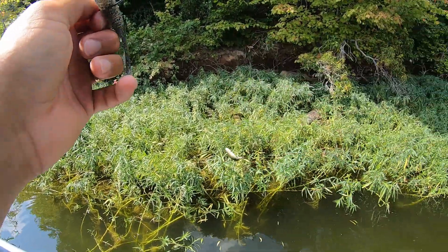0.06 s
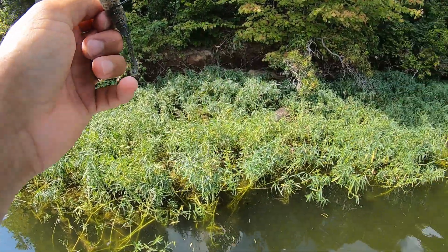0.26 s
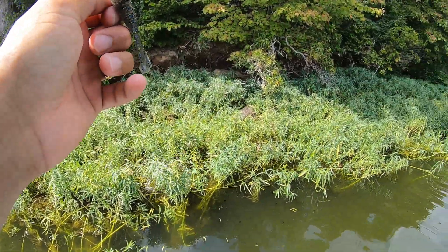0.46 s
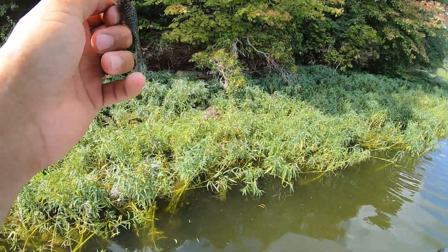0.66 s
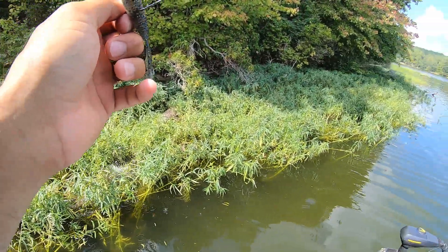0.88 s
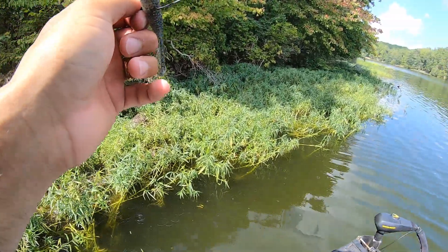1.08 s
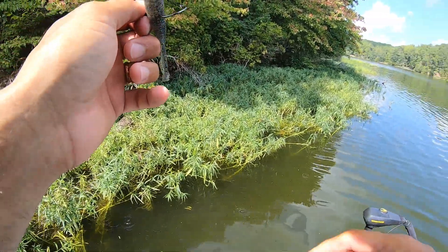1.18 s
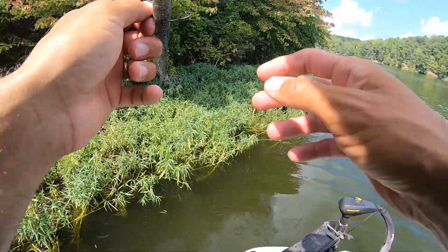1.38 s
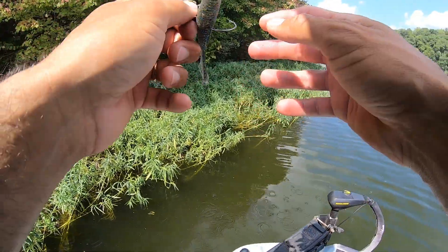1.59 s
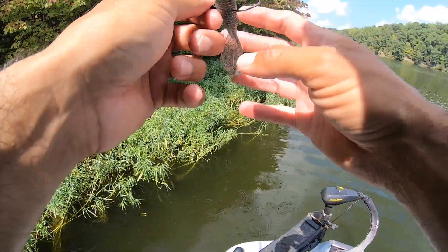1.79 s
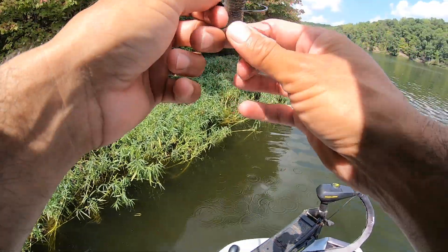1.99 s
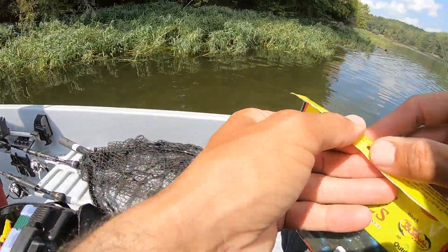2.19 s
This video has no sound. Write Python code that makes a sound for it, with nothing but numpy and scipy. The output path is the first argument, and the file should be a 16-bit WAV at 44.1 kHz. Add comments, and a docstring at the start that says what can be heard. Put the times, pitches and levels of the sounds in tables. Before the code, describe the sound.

A slapping, gurgling splash in grassy shallows is followed by falling drops, heard from a small boat on a lake. High insect hiss and soft wind continue as water laps the hull and nearby tackle clicks at the end.

```python
"""A splash in flooded grass

A weight thrown from a small boat slaps through the grass at a lake shore and gulps under as
pockets of air ring in the water. The thrown water patters back, with a faint echo off the bank.
Insects hiss in the trees, a breeze blows and low ripples lap at the hull. Near the end come
a light knock in the boat and the clicks of fishing tackle in the hands, close by."""
import sys
import numpy as np
from scipy import signal
from scipy.fft import rfft, irfft
from scipy.io import wavfile

SR = 44100
rng = np.random.default_rng(int(sys.argv[2]) if len(sys.argv) > 2 else 0)


def generate_wav(sig):
    """Save sig (samples, or channels by samples) to the path in sys.argv[1] as 16-bit PCM at SR."""
    pcm = np.round(np.clip(np.atleast_2d(sig).T, -1, 1) * 32767).astype(np.int16)
    wavfile.write(sys.argv[1], SR, pcm)


N = 99225
T = np.arange(N) / SR

# fade_s is the time to die away by 60 dB; pan_db above zero is to the left.
# Loudness of the insects' song, hiss and highest hiss: time_s, level_db
SONG_LEVEL = [(0, -45), (0.3, -45.5), (0.7, -46.5), (1.1, -46.5), (2.25, -46.5)]
HISS_LEVEL = [(0, -51.5), (0.3, -54), (1.1, -53.5), (1.7, -56), (2.25, -57.5)]
SHIMMER_LEVEL = [(0, -80), (0.85, -71), (1.2, -62), (1.5, -73), (1.9, -88)]
# Loudness of the breeze and the water sounds: time_s, level_db
BREEZE_LEVEL = [(0, -50), (0.25, -49), (0.48, -43), (0.58, -52), (0.92, -52.5), (1.35, -49), (1.6, -51),
                (2.25, -51)]
TRICKLE_LEVEL = [(0, -66.5), (0.95, -75), (1.13, -62), (1.2, -76), (1.4, -72), (1.55, -62.5), (1.9, -64),
                 (2.05, -70.5), (2.13, -58), (2.25, -60)]
SPRAY_LEVEL = [(0.185, -78), (0.205, -52.5), (0.224, -44.5), (0.234, -31.5), (0.262, -36.5), (0.285, -38),
               (0.322, -47), (0.34, -36), (0.372, -37.5), (0.40, -50), (0.46, -44.5), (0.56, -46.5),
               (0.66, -48), (0.755, -37.5), (0.78, -43.5), (0.81, -36.5), (0.865, -36.5), (0.92, -50.5),
               (0.98, -55.5), (1.2, -61.5), (1.3, -75)]
FROTH_LEVEL = [(0.37, -100), (0.39, -60), (0.41, -41), (0.43, -35.5), (0.445, -67), (0.55, -54), (0.6, -80),
               (0.87, -46.5), (0.895, -43.5), (0.915, -36.5), (0.93, -63), (0.97, -51), (1.02, -71)]
# Tone of each noise, from bass to treble: pitch_hz, gain_db
HISS_TONE = [(4000, -77), (5500, -12), (6400, 10.5), (6900, -32.5), (8000, 16.5), (8600, 7), (9600, 11),
             (10300, 8.5), (11000, 3), (13000, 5), (15800, 0)]
BREEZE_TONE = [(20, -32), (40, -13), (65, -3), (140, 3.5), (220, 0.5), (380, -3.5), (550, -13),
               (750, -16.5), (1000, -35), (1550, -21), (2200, -25), (3400, -30.5), (5500, -26),
               (16000, -53)]
SPRAY_TONE = [(120, -8), (250, 4), (400, 8.5), (520, 5.5), (760, -6), (1000, 1.5), (1300, -11.5),
              (1950, 2.5), (2950, -4.5), (4300, -4), (6000, -5.5), (7200, -12.5), (9000, -13),
              (12000, -24.5), (16000, -34)]
# Stereo width, as side against mid: pitch_hz, side_db
BREEZE_WIDTH = [(50, -16), (200, -13.5), (480, -9), (950, 12), (1900, -2.5), (8000, 0.5)]
SPRAY_WIDTH = [(200, -23), (500, -33), (1100, 0.5), (2300, -19), (4400, -17), (8000, 4.5)]
# Low, short thumps: start_s, pitch_hz, level_db, attack_s, fade_s
THUMPS = [(0.021, 74.5, -39.5, 0.015, 0.076), (0.358, 192, -26.5, 0.0082, 0.078),
          (0.388, 122, -29.5, 0.0058, 0.076), (0.436, 134, -39, 0.0039, .11),
          (0.707, 221, -35, 0.0024, 0.041), (0.748, 268, -26.5, 0.0017, 0.013),
          (1.25, 98, -32, 0.0046, 0.054), (1.281, 202, -36.5, 0.0059, 0.043),
          (1.305, 141.7, -31.5, 0.006, 0.093), (1.307, 296, -38.5, 0.0015, 0.055),
          (1.304, 470, -39.5, 0.0053, 0.071), (1.33, 91, -36.5, 0.0046, 0.075),
          (1.657, 81, -44, 0.0054, 0.093), (2.109, 117, -36.5, 0.003, 0.065)]
# Trapped air: start_s, pitch_hz, level_db, attack_s, fade_s, glide_octaves_per_s, pan_db
AIR_POCKETS = [(0.226, 1910, -26, 0.0021, 0.036, -6, -3), (0.228, 437, -27, 0.003, 0.022, -9, 2.5),
               (0.2667, 458, -22, 0.0063, 0.046, -2.5, 1.5), (0.301, 440, -20, 0.004, 0.019, 6, 1),
               (0.3012, 986, -18, 0.0031, 0.034, 9, -6), (0.2999, 1464, -21, .001, 0.0081, -8, 15.5),
               (0.3, 1840, -13, 0.00059, 0.015, -3, -3), (0.3005, 2250, -18.5, 0.0022, 0.013, 1, 2.5),
               (0.356, 336.5, -9, 0.0073, 0.02, 22.5, 1), (0.36, 1012, -31, 0.00096, 0.081, -5.5, -10),
               (0.371, 389, -28.5, 0.001, 0.2, -1, 1), (0.376, 523, -26, 0.0035, 0.032, 10, -2),
               (0.408, 1080, -33, 0.0011, 0.042, -2, -5), (0.414, 380, -28, 0.0028, 0.07, 6, -2),
               (0.423, 793, -32.5, 0.0049, 0.024, 46, -17), (0.893, 1030, -33, 0.0095, 0.037, 5, 7),
               (0.884, 540, -36, 0.012, 0.1, 6, 0), (0.942, 451, -36.5, 0.0037, 0.031, 3, -1),
               (1.161, 721, -46, 0.0022, 0.067, 0, 3), (1.793, 1086, -54, 0.0051, 0.021, 4, 14)]
# Slaps on wet grass, laps by the boat: start_s, level_db, attack_s, fade_s, low_hz, high_hz, pan_db
SLAPS = [(0.227, -22.5, 0.0033, 0.026, 1770, 6470, -2), (0.267, -30.5, 0.0012, 0.043, 1600, 3250, 0),
         (0.301, -34, 0.00059, 0.015, 5800, 6700, -1), (0.361, -31, 0.0047, 0.12, 1420, 4000, 0),
         (0.7066, -27, 0.0012, 0.0061, 300, 6000, 1), (0.726, -37, 0.0014, 0.029, 1830, 6040, -4),
         (0.7477, -20.5, 0.0016, 0.013, 1330, 7200, 4), (0.7485, -28, 0.0024, 0.012, 225, 1680, -3.5),
         (0.848, -31, 0.00023, 0.017, 1780, 2630, 7), (0.416, -37.5, 0.011, 0.037, 1570, 2320, 0),
         (0.528, -37.5, 0.00079, 0.013, 3000, 4800, 0), (0.5655, -34.5, 0.00054, 0.012, 3280, 6160, 0),
         (0.691, -43, 0.0036, 0.025, 400, 4000, 5)]
LAPS = [(1.097, -49.5, 0.0045, 0.047, 1780, 2410, 8), (1.112, -51.5, 0.0055, .04, 2100, 4460, 4),
        (1.303, -44, 0.003, 0.13, 400, 740, -5.5), (1.32, -49.5, 0.0013, 0.052, 920, 3600, -12.5),
        (1.396, -50, 0.00029, 0.016, 434, 1520, -3), (1.968, -57, 0.0023, 0.19, 1000, 4000, 4)]
# Large falling drops: start_s, pitch_hz, level_db
DRIPS = [(0.32, 1930, -33), (0.327, 440, -30.5), (0.508, 2020, -40), (0.524, 480, -41), (0.530, 1650, -40),
         (0.542, 3900, -41), (0.551, 725, -39), (0.570, 2350, -37), (0.586, 1820, -43), (0.635, 1670, -45),
         (0.650, 1900, -39), (1.163, 1120, -47)]
# Notes the boat and the tackle ring with: pitch_hz, gain_db, fade_s
BOAT_NOTES = [(180, -43, 0.15), (440, -38, 0.014), (1374, -39.5, 0.022), (1830, -43.5, 0.018),
              (2250, -54, .016)]
TACKLE_NOTES = [(890, -13.5, 0.0027), (1650, -7.5, 0.0084), (2200, -5, 0.0041), (3360, -2, 0.0036),
                (4240, -3, 0.0043), (6900, -7, 0.0012)]
# Taps on the tackle: start_s, gain_db, brightness_db_per_octave
CLICKS = [(2.1069, -27, -5), (2.1103, -32, -8), (2.1183, -41, 5), (2.1268, -31, -9), (2.163, -40, -3),
          (2.177, -34, -9), (2.195, -19.5, 5), (2.2025, -37.5, -10.5), (2.2097, -38, -6),
          (2.218, -38, -10.5)]


def from_db(db):
    """Turn decibels into a gain."""
    return 10 ** (np.asarray(db) / 20)


def normalize(x):
    """Scale to an average strength (rms) of one."""
    return x / np.sqrt(np.mean(x ** 2) + 1e-20)


def level(rows):
    """Join loudness points into a gain over time."""
    return from_db(np.interp(T, *np.transpose(rows)))


def colour(x, points):
    """Turn each pitch up or down along a curve."""
    hz, db = np.transpose(points)
    bins = np.maximum(np.fft.rfftfreq(N, 1 / SR), 1)
    return irfft(rfft(x) * from_db(np.interp(np.log(bins), np.log(hz), db)), N)


def band(x, low_hz, high_hz, order=2):
    """Keep the sound between two pitches; the low edge is never under 10 Hz."""
    low = max(low_hz, 10)
    high = max(high_hz, 1.05 * low)
    return signal.sosfilt(signal.butter(order, [low, high], "band", fs=SR, output="sos"), x)


def widen(mid, side):
    """Make left and right from what they share (mid) and how they differ (side)."""
    return np.array([mid + side, mid - side])


def add(out, start_s, sound, pan_db=0):
    """Mix in a short sound at its time and place."""
    i = int(start_s * SR)
    out[:, i:i + sound.shape[-1]] += from_db([[pan_db / 2], [-pan_db / 2]]) * sound[..., :N - i]


def waver(depth, speed):
    """A gain that wanders randomly around one."""
    return np.exp(depth * normalize(band(rng.standard_normal(N), speed / 3, speed, order=1)))


def strike(attack_s, fade_s):
    """Loudness that rises smoothly, then dies away."""
    t = T[:SR // 3]
    rise = np.sin(np.pi / 2 * np.minimum(t / attack_s, 1)) ** 2
    return rise * from_db(-60 * np.maximum(t - attack_s, 0) / fade_s)


def drops(per_s, spread_db, cycles, low_hz, high_hz, pitches):
    """Random drops, each ringing a few cycles at its own pitch; gives mid and side."""
    sizes = from_db(spread_db * np.minimum(rng.exponential(1, N), 4))
    lands = rng.random(N) < per_s / SR
    hits = sizes * lands * np.array([rng.choice([-1, 1], N), rng.standard_normal(N)])
    pitch_index = (pitches * rng.random(N) ** .7).astype(int)
    out = 0
    for k, hz in enumerate(np.geomspace(low_hz, high_hz, pitches)):
        decay = from_db(-60 * hz / (cycles * SR))
        feedback = [1, -2 * decay * np.cos(2 * np.pi * hz / SR), decay ** 2]
        out += signal.lfilter([1 - decay, 0, decay - 1], feedback, hits * (pitch_index == k) + 1e-18)
    return normalize(out)


def bubble(hz, attack_s, fade_s, octaves_per_s, wobble_hz=130):
    """A fading note that slides in pitch; it starts smooth, then wobbles."""
    shape = strike(attack_s, fade_s)
    t = T[:len(shape)]
    pitch = hz * 2 ** (octaves_per_s * np.minimum(t, fade_s / 2))
    wobble = normalize(band(rng.standard_normal((2, len(t))), wobble_hz / 10, wobble_hz))
    swell, bend = .17 * wobble * np.minimum(t / 0.025, 1)  # builds over 25 ms
    return shape * (1 + swell) * np.sin(2 * np.pi * np.cumsum(pitch) / SR + bend)


def ring(hz, fade_s):
    """One fading note of a struck solid."""
    t = T[:SR // 3]
    return from_db(-60 * t / fade_s) * np.sin(2 * np.pi * hz * t)


def contact(rattle_db, fade_s):
    """A snap, then a dying rattle of loose parts, in stereo."""
    fade = from_db(-60 * T[:SR // 5] / fade_s)
    rattle = rng.standard_normal((2, len(fade))) * fade / np.linalg.norm(fade)
    return signal.unit_impulse(len(fade)) + from_db(rattle_db) * rattle


def insects(pitch_hz=7714, width_hz=480, ears_alike=0.046):
    """A high, narrow chorus that throbs and buzzes, with a thinner, flickering hiss around it."""
    mid, side, throb, buzz = rng.standard_normal((4, N))
    noise = widen(np.sqrt(1 + ears_alike) * mid, np.sqrt(1 - ears_alike) * side)
    song = band(noise, pitch_hz - width_hz / 2, pitch_hz + width_hz / 2)
    throb = 0.11 * normalize(band(throb, 1.07 * 12.2, 1.32 * 12.2))  # 13 to 16 pulses a second
    buzz = 0.054 * normalize(band(buzz, 0.93 * 114.3, 0.94 * 114.3))  # about 110 a second
    chorus = level(SONG_LEVEL) * normalize(song * (1 + throb + buzz))
    hiss = normalize(colour(rng.standard_normal((2, N)) + 0.22 * rng.standard_normal(N), HISS_TONE))
    return chorus + level(HISS_LEVEL) * hiss * waver(depth=0.19, speed=30)


def shimmer():
    """The highest insects swell and fade again."""
    return level(SHIMMER_LEVEL) * normalize(band(rng.standard_normal((2, N)), 12000, 15000))


def breeze():
    """A low, fluttering wash of wind and ripples."""
    mid, side = rng.standard_normal((2, N))
    wash = normalize(colour(widen(mid, colour(side, BREEZE_WIDTH)), BREEZE_TONE))
    return level(BREEZE_LEVEL) * wash * waver(depth=0.2, speed=9.6)


def trickle():
    """Water seeps softly among the stems, a little to the left."""
    mid, side = drops(per_s=5000, spread_db=3.7, cycles=16, low_hz=1050, high_hz=2700, pitches=14)
    return level(TRICKLE_LEVEL) * widen(mid, from_db(-6) * side) * from_db([[1.5], [-1.5]])


def thumps():
    """Low, short thumps: a puff of wind, the splash, water on the hull, and handled tackle."""
    out = np.zeros((2, N))
    for start, hz, db, attack, fade in THUMPS:
        add(out, start, from_db(db) * bubble(hz, attack, fade, octaves_per_s=1.2))
    return out


def spray():
    """Drops patter on grass and water, over a mist of tiny ones."""
    patter = drops(per_s=2600, spread_db=2.5, cycles=5.6, low_hz=380, high_hz=9700, pitches=24)
    mist = from_db(-6.5) * rng.standard_normal((2, N))
    mid, side = patter + mist
    return level(SPRAY_LEVEL) * normalize(colour(widen(mid, colour(side, SPRAY_WIDTH)), SPRAY_TONE))


def gulps():
    """Air pockets ring as they close behind the weight; smaller bubbles follow."""
    out = np.zeros((2, N))
    for start, hz, db, attack, fade, glide, pan in AIR_POCKETS:
        add(out, start, from_db(db) * bubble(hz, attack, fade, glide), pan)
    return out


def splashes(rows, side_db):
    """Each slap or lap churns the water into a short burst of noise."""
    out = np.zeros((2, N))
    for start, db, attack, fade, low, high, pan in rows:
        shape = strike(attack, fade)
        bursts = shape * rng.standard_normal((2, len(shape)))
        mid, side = (normalize(band(burst, low, high, order=4)) for burst in bursts)
        side = side + 2.1 * np.diff(side, prepend=0)  # treble spreads wider than bass
        gain = from_db(db) * np.sqrt(np.mean(shape ** 2))
        add(out, start, gain * widen(mid, from_db(side_db) * side), pan)
    return out


def shore_echo(x, gain_db=-18, delay_s=0.014, fade_s=0.27):
    """The wooded bank scatters back a faint, dull echo."""
    t = T[:SR]
    scatter = band(rng.standard_normal((2, SR)), 590, 4000, order=1)
    tail = normalize(scatter * from_db(-60 * t / fade_s) * (t > delay_s)) / np.sqrt(SR)
    return from_db(gain_db) * signal.fftconvolve(x, tail, axes=1)[:, :N]


def drips():
    """Each large drop traps one small bubble, whose pitch climbs."""
    out = np.zeros((2, N))
    for start, hz, db in DRIPS:
        add(out, start, from_db(db) * bubble(hz, attack_s=0.0011, fade_s=0.037, octaves_per_s=3.7))
    return out


def froth():
    """Small bubbles come up in a ragged gurgle after each plunge."""
    mid, side = drops(per_s=1800, spread_db=0.92, cycles=16, low_hz=540, high_hz=1164, pitches=14)
    return level(FROTH_LEVEL) * widen(mid, from_db(-8) * side)


def knock(start_s=1.7412):
    """One light, hollow blow in the boat, with a loose rattle."""
    out = np.zeros((2, N))
    body = sum(from_db(db) * ring(hz, fade) for hz, db, fade in BOAT_NOTES)
    blow = contact(rattle_db=1, fade_s=0.15)[0]
    add(out, start_s, signal.fftconvolve(blow, body), pan_db=2)
    return out


def tackle():
    """Each tap sets the tackle ringing, with its own loudness and brightness."""
    out = np.zeros((2, N))
    centre_hz = np.median([hz for hz, _, _ in TACKLE_NOTES])
    for start, db, brightness in CLICKS:
        body = sum((-1) ** k * from_db(note_db + brightness * np.log2(hz / centre_hz)) * ring(hz, fade)
                   for k, (hz, note_db, fade) in enumerate(TACKLE_NOTES))
        tap = contact(rattle_db=-2.5, fade_s=0.035)
        add(out, start, from_db(db) * signal.fftconvolve(tap, body[None], axes=1), pan_db=-3)
    return out


def scene():
    """Mix the splash and its echo, the small sounds at the boat, and the lakeside."""
    splash = splashes(SLAPS, side_db=-17.5) + gulps() + spray() + drips() + froth()
    boat = thumps() + splashes(LAPS, side_db=-9) + trickle() + knock() + tackle()
    return splash + shore_echo(splash) + boat + insects() + shimmer() + breeze()


def record(dry):
    """Steeply cut the treble above 15800 Hz."""
    return signal.sosfiltfilt(signal.ellip(10, .05, 60, 15800, fs=SR, output="sos"), dry)


dry = scene()
out = record(dry)
generate_wav(out)
```